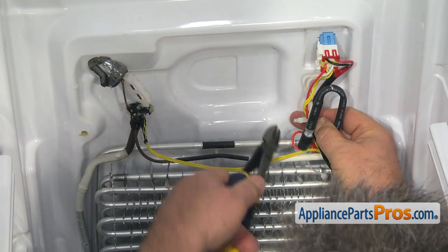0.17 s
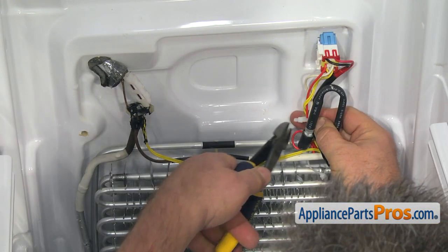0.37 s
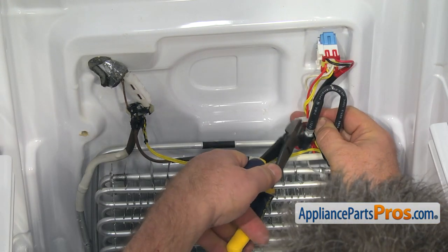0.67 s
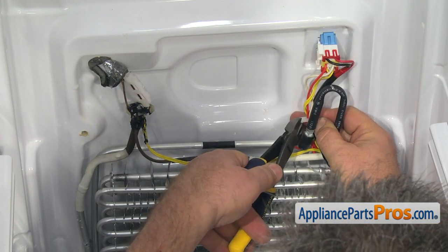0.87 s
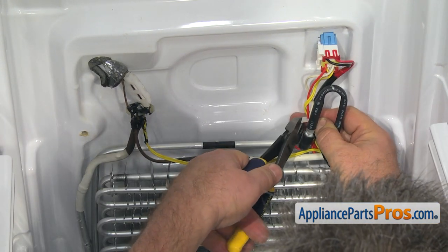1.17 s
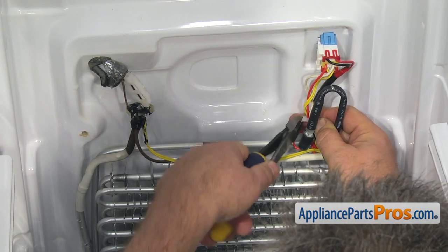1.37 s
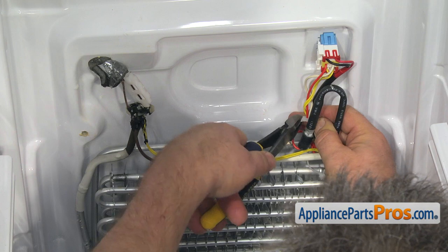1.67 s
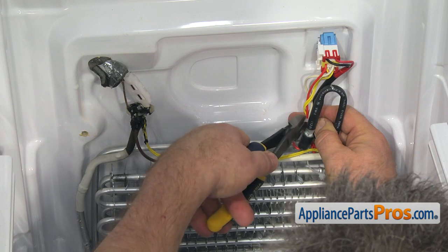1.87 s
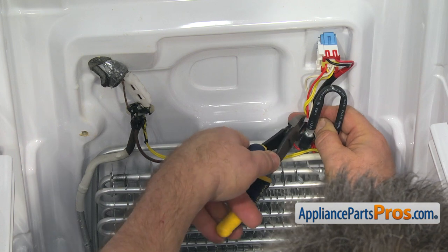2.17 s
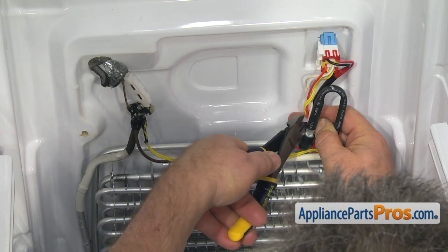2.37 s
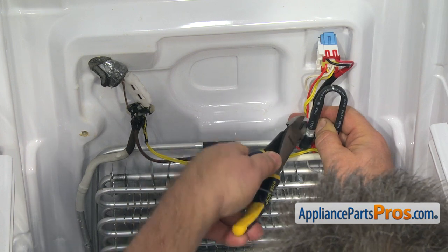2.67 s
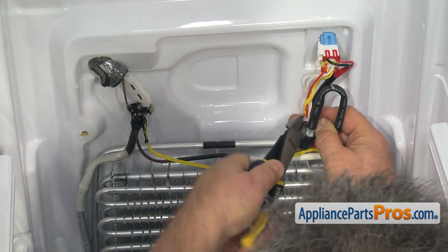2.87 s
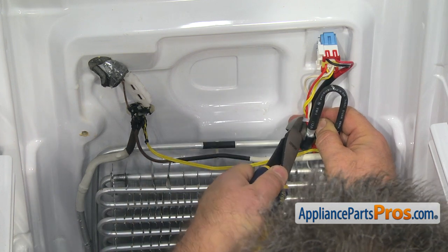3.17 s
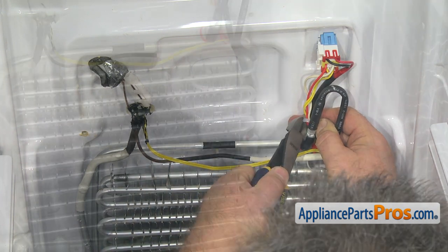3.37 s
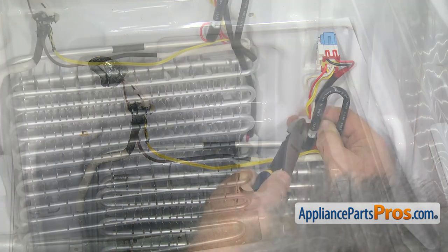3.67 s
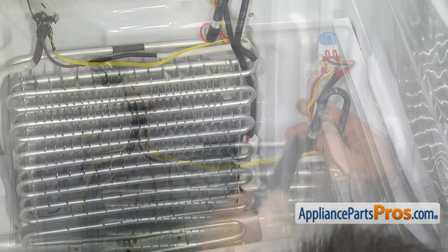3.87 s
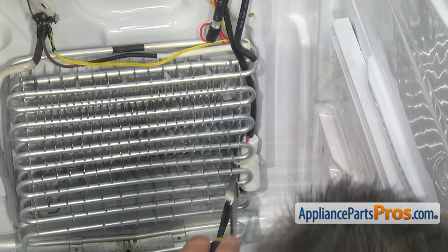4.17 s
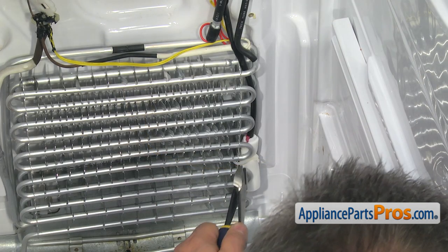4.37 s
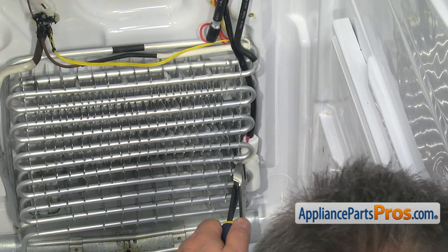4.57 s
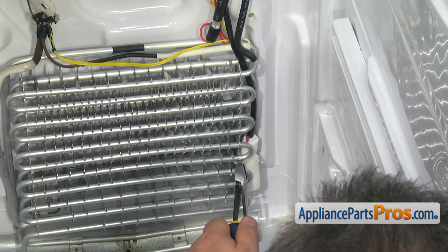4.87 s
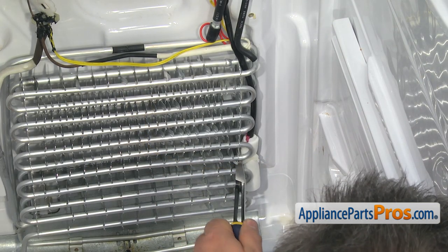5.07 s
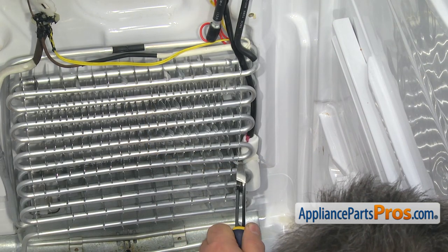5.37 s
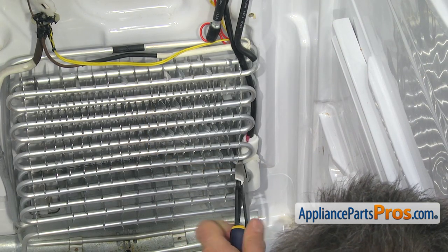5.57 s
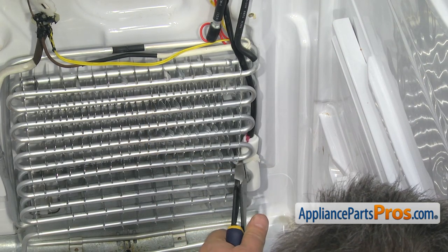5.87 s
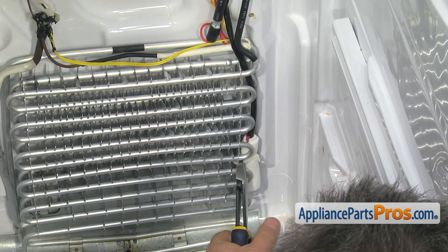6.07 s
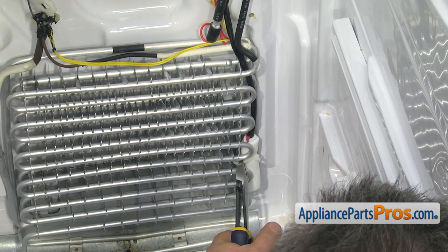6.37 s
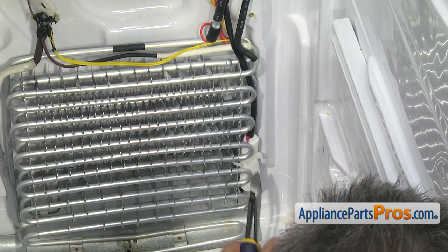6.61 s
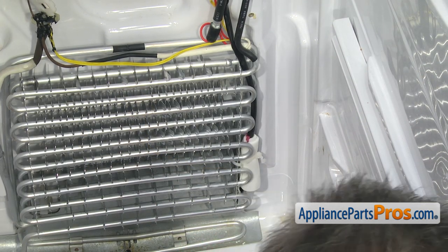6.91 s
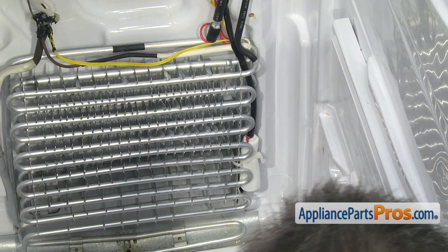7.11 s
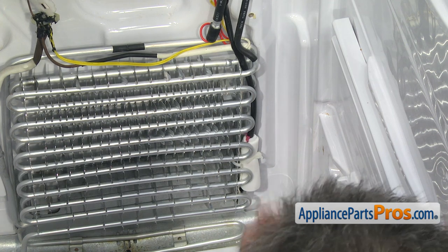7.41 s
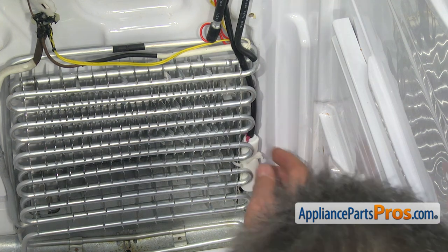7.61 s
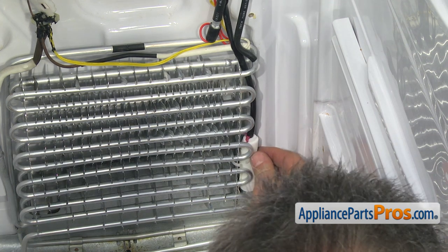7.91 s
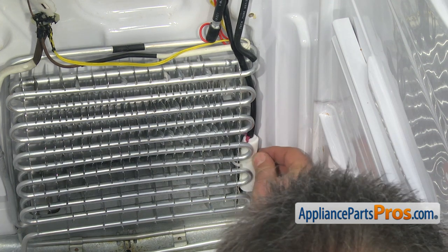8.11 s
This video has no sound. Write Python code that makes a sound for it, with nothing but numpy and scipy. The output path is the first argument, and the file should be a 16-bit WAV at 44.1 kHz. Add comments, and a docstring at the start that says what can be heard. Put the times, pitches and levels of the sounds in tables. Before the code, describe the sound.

Close, boxy and quiet: a deep, unsteady hum, faint hiss and hand movement, with tiny dry ticks for the first seconds. A crisp plastic snip bursts out, its bright wash dying fast. Moderate knocks and a short rub lead to a loud clank that rings the panels and thumps the walls. Then a second fuller snip, a sliding contact just after, and soft fumbling at the end, all inside a hard cabinet.

```python
"""Inside a hard-walled freezer cabinet, side cutters snip two plastic ties off a wire harness.
Cuts, knocks and rubs are short pushes: they fill the box with a bright wash of noise and set its
panels ringing. Heavy blows swing the walls, small parts tick (short bursts of noise), and at times
one panel resonance, fed by noise, sings faintly. A low hum of ringing noise wavers below; moving
hands and arms make the panels murmur and the hiss swell."""
import sys
import numpy as np
from scipy import signal
from scipy.fft import rfft, irfft
from scipy.io import wavfile
from scipy.ndimage import uniform_filter1d

SR = 44100
rng = np.random.default_rng(int(sys.argv[2]) if len(sys.argv) > 2 else 0)


def log_audio(samples):
    """Write samples as a 16-bit WAV file to the path given in sys.argv[1]."""
    # one column per channel
    frames = np.atleast_2d(samples).T
    # limit to full scale, then quantise
    limited = np.clip(frames, -1, 1)
    pcm = np.round(limited * 32767).astype(np.int16)
    wavfile.write(sys.argv[1], SR, pcm)


def volts_from_db(level):
    """Convert decibel levels to linear amplitude ratios."""
    exponent = np.asarray(level, float) / 20
    return 10 ** exponent


N = 363825   # length in samples

# Levels of contacts, panels, walls and wash are relative drives, not loudness in the mix.
# the blades meet: t/s, panels/dB, 0.7-3 kHz/dB, 7-16 kHz/dB, contact length/s
CUTS = [(3.512, -39.5, -35, -24.5, 0.0051), (6.4651, -33, -33, -19, 0.0086)]
# tool, fingers and loose tie ends touch wires, fins and walls:
# t/s, panels/dB, 0.7-3 kHz/dB, 7-16 kHz/dB
TOUCHES_AND_KNOCKS = [(0.0386, -83, -71.5, -58), (0.28, -66.5, -73.5, -90), (1.813, -60.5, -77, -81),
                      (1.8574, -56.5, -55.5, -58.5), (2.3305, -59, -64.5, -71.5), (2.37, -66, -67, -80),
                      (2.484, -63.5, -69, -73), (2.558, -69, -78, -76), (2.625, -72, -74, -74),
                      (3.8824, -49.5, -70.5, -63.5), (4.179, -77, -74, -71), (4.6374, -42.5, -54, -61.5),
                      (5.174, -31.5, -38, -31.5), (5.8324, -63, -75, -74), (7.717, -62.5, -65, -79.5),
                      (7.8491, -62, -52, -62), (8.2091, -71, -57, -50)]
# longer, sliding contacts of skin, steel or a loose tie end:
# t/s, panels/dB, 0.7-3 kHz/dB, 7-16 kHz/dB, contact length/s
SLIDING_CONTACTS = [(2.645, -63, -72.5, -62, 0.024), (3.521, -59.5, -68.5, -32.5, 0.0083),
                    (3.748, -56, -67, -72.5, 0.015), (5.135, -42, -42, -49.5, 0.09),
                    (5.47, -59.5, -76, -73, 0.035), (5.565, -54.5, -66, -68.5, 0.025),
                    (5.62, -54, -83, -87, 0.045), (5.68, -67, -78, -74.5, 0.038),
                    (6.608, -41.5, -39.5, -37, 0.012), (7.142, -56, -63.5, -64, 0.013),
                    (7.935, -96, -69, -62, 0.024), (8.125, -79, -67, -58, 0.033)]
# dry ticks of small hard parts: t/s, peak level/dB, f/Hz, second f/Hz, mounting level/dB
SMALL_PART_TICKS = [(0.818, -69, 1076, 2690, 1), (1.393, -65, 1970, 4400, -6),
                    (1.585, -62.5, 7360, 5100, -12), (2.102, -60.5, 1500, 2180, -8),
                    (2.851, -63.5, 6130, 9000, -8), (3.051, -62.5, 1800, 5500, -13),
                    (3.631, -34, 2257, 4440, 5), (7.681, -62, 3400, 9000, -7.5),
                    (8.083, -56.5, 6400, 3820, -12)]
# one panel resonance sings faintly for a while: start t/s, length/s, f/Hz, rms before fading/dB
PANEL_SINGING = [(2.364, 0.46, 1097, -82.5), (4.125, 0.27, 356, -72), (4.267, 0.24, 766, -85.5),
                 (6.231, 0.25, 754, -80.5), (6.741, 0.19, 395, -76)]
# heavy blows on the large walls: t/s, level/dB
HEAVY_BLOWS = [(3.52, -35), (3.885, -49), (5.181, -25), (5.623, -48.5), (6.471, -30.5), (8.202, -49.5)]
# a blow catches one panel or tube hard, and it rings on: t/s, f/Hz, level/dB, 60 dB fade/s
HARD_RINGS = [(4.647, 387, -49, 0.24), (4.642, 500, -54.5, 0.21), (4.642, 636, -55, 0.15),
              (5.176, 1002, -62, 0.74), (5.177, 1206, -69, 0.57), (5.178, 2200, -67, 0.36),
              (5.178, 446.6, -46, 0.35), (6.472, 452, -57, 0.17), (6.612, 1570, -74, 0.7),
              (6.614, 975, -64, 0.42)]
# lowest modes of the large walls: f/Hz, level/dB, 60 dB fade/s
WALL_MODES = [(97.7, 0, 0.19), (131.9, -1.5, .12), (188.6, 5, 0.1), (260, -4, 0.15)]
# resonances of the cabinet panels: f/Hz, level/dB, 60 dB fade/s
PANEL_MODES = [(365.3, -2, 0.27), (439, -6, 0.044), (589.7, -12.5, 0.086), (688, -18.5, 0.16),
               (802, -17, 0.55), (895, -11.5, 0.33), (1048, -11.5, 0.23), (1270, -18.5, 0.1),
               (1570, -19.5, 0.48), (2200, -24, 0.17)]
# how fast the wash dies at each pitch: f/Hz, 60 dB fade/s
WASH_FADE = [(150, 0.18), (1000, 0.073), (3000, 0.1), (8000, 0.087), (12000, 0.067), (16000, 0.077)]
# colour of the wash: f/Hz, after a cut/dB, after other contacts/dB, late tail/dB
WASH_COLOUR = [(142, -4.5, -0.5, -15), (300, -5.5, -8.5, -23), (500, -1.5, -5, -11), (788, -0.5, -2.5, -15),
               (1130, 2.5, -3.5, -14), (1500, -1, 0, -21.5), (2200, -0.5, -2, -22.5),
               (2900, -8.5, -9, -22.5), (4110, -2, -9, -32), (5500, -5, -4, -28.5), (6530, -6, 0.5, -36.5),
               (9000, 0.5, 5.5, -36), (12400, 10.5, -0.5, -30), (16700, -6, 7.5, -42.5)]
# colour of the steady background: f/Hz, relative level per Hz/dB
QUIET_COLOUR = [(12, -41.5), (20, -24), (86, -10.5), (101, -6.5), (113, -33.5), (150, 4), (177, -32),
                (241, -22.5), (319, -30), (357, -31.5), (780, -36), (897, -36.5), (1220, -35.5),
                (14300, -38.5), (16000, -85)]
# colour of the noise that differs between the channels: f/Hz, relative level per Hz/dB
SIDE_COLOUR = [(12, -33.5), (20, 4.5), (30, -8), (38, -23), (53, -36), (1650, -34), (13700, -33),
               (15800, -37.5)]
# the hum wavers: t/s, rms level/dB
HUM_LEVEL = [(0.0, -60.5), (0.5, -60), (1.2, -63), (1.9, -59.5), (2.6, -59), (3.302, -62.5), (3.7, -63),
             (4.05, -58.5), (4.25, -65.5), (4.66, -56), (5.26, -62), (5.55, -62), (5.8, -57.5),
             (6.1, -60.5), (7.1, -59.5), (7.309, -56), (7.5, -60), (8.25, -63.5)]
# hands and arms move in the box: middle t/s, length/s, murmur level/dB, hiss level/dB
HAND_MOVES = [(0.052, 1, -77, -76), (1.47, 0.51, -77.5, -97), (1.886, 0.31, -69.5, -100),
              (2.533, 0.88, -77, -95), (3.809, 0.67, -69, -77.5), (4.107, 0.91, -72, -77),
              (5.101, 0.18, -78.5, -77), (5.57, 0.35, -70, -79.5), (6.596, .4, -69.5, -105),
              (6.97, 0.28, -76, -77), (7.284, 0.6, -70.5, -69), (7.837, 0.75, -71.5, -80.5),
              (8.27, 0.45, -68, -71.5)]


def rms_one(x):
    """Scale to an rms (average strength) of 1."""
    return x / np.sqrt(np.mean(x ** 2) + 1e-20)


def at_hz(table, hz, column=1):
    """Read a table column between its rows, with pitch on a log scale."""
    table = np.array(table)
    return np.interp(np.log(hz), np.log(table[:, 0]), table[:, column])


def band(x, low_hz, high_hz):
    """Keep only the sound between two frequencies."""
    sos = signal.butter(2, [low_hz, min(high_hz, .45 * SR)], "band", fs=SR, output="sos")
    return signal.sosfilt(sos, x)


def ring(x, hz, t60_s):
    """A resonance: a click of height 1 starts a sine of height 1 that falls 60 dB in t60_s."""
    shrink = volts_from_db(-60 / (t60_s * SR))
    turn = 2 * np.pi * hz / SR
    # the tiny offset keeps the filter away from vanishingly small numbers
    return signal.lfilter([0, np.sin(turn)], [1, -2 * shrink * np.cos(turn), shrink ** 2], x + 1e-18)


def contact_rows():
    """All contacts as rows: t/s, 3-7 kHz/dB, panels/dB, 0.7-3 kHz/dB, 7-16 kHz/dB, length/s."""
    touch_s = 0.0049
    dull_stretch = 0.35   # a dull touch is soft and lasts longer: dB of length per dB panels over treble
    touches = []
    for s, low_db, mid_db, top_db in TOUCHES_AND_KNOCKS:
        length_s = touch_s * volts_from_db(dull_stretch * (low_db - top_db))
        touches.append((s, low_db, mid_db, top_db, length_s))
    every = list(CUTS) + touches + list(SLIDING_CONTACTS)
    s, low_db, mid_db, top_db, length_s = np.transpose(every)
    # 3-7 kHz lies between its neighbours, a little higher for contacts that are not cuts
    presence_db = top_db + 0.2 * (mid_db - top_db)
    presence_db = presence_db + 2.5 * (np.arange(len(s)) >= len(CUTS))
    return np.transpose([s, presence_db, low_db, mid_db, top_db, length_s])


def contacts(rows, levels_db):
    """Each contact is a half-sine push of its own length and unit area, times its level."""
    out = np.zeros(N)
    for row, level_db in zip(rows, levels_db):
        at = round(row[0] * SR)
        size = max(round(row[5] * SR), 8)
        push = np.sin(np.pi * np.arange(size) / size)[:N - at]
        out[at:at + size] += volts_from_db(level_db) * push * np.pi / (2 * size)
    return out


def wash(rows, uneven_db=2.0, grain_db=2.0):
    """Dense echoes build up in a few ms and die band by band, with a weak late tail."""
    rise_s, level_db, late_stretch = 0.001094, -7, 3.5
    out = np.zeros(N)
    edges = 150 * 2 ** np.arange(0, 7, 1 / 3)   # bands a third of an octave wide
    white = rng.standard_normal((2, N))
    chance = rng.standard_normal((len(rows), len(edges)))   # every contact colours the wash anew
    rise = np.exp(-1 / (rise_s * SR))
    grain = rms_one(uniform_filter1d(rng.standard_normal(N), size=40))
    is_cut = np.arange(len(rows)) < len(CUTS)
    for k, (low, high) in enumerate(zip(edges, edges[1:])):
        hz = np.sqrt(low * high)
        range_hz = np.log([400, 1500, 4600, 10500])
        contact_db = [np.interp(np.log(hz), range_hz, row[[2, 3, 1, 4]]) for row in rows]
        colour_db = np.where(is_cut, at_hz(WASH_COLOUR, hz, 1), at_hz(WASH_COLOUR, hz, 2))
        press = contacts(rows, contact_db + colour_db + uneven_db * chance[:, k] + level_db)
        press = signal.lfilter([1 - rise], [1, -rise], press + 1e-18)
        fall = volts_from_db(-60 / (at_hz(WASH_FADE, hz) * SR))
        late_fall = fall ** (1 / late_stretch)   # the room beyond the open door dies more slowly
        shape = signal.lfilter([1], [1, -fall], press)
        late = signal.lfilter([1], [1, -late_fall], press)
        shape += volts_from_db(at_hz(WASH_COLOUR, hz, 3)) * late
        echoes = volts_from_db(grain_db * grain * (hz > 1200))   # single echoes stand out above 1200 Hz
        noise = band(band(white[k % 2], low, high), low, high)
        out += shape * echoes * rms_one(noise)
    return out


def panels(rows, uneven_db=1.5, rattle_s=0.0064, split=.025):
    """A contact rattles for a moment; each panel answers with five close modes that beat."""
    panel_db = -10.5
    out = np.zeros(N)
    chance = rng.standard_normal((len(rows), len(PANEL_MODES)))
    fade = np.exp(-1 / (rattle_s * SR))
    for k, (hz, level_db, t60_s) in enumerate(PANEL_MODES):
        # the higher the panel mode, the more its blow follows the 0.7-3 kHz column
        share = np.interp(np.log(hz), np.log([400, 1200]), [0, 1])
        blow_db = (1 - share) * rows[:, 2] + share * rows[:, 3] + uneven_db * chance[:, k]
        push = contacts(rows, blow_db + level_db + panel_db)
        press = signal.lfilter([1], [1, -fade], push + 1e-18)
        for detune in 1 + split * np.array([-3.0, -0.36, -1.1, 0.7, 1.1]):
            rattle = press * rng.standard_normal(N) * np.sqrt(1 - fade ** 2)
            out += ring(rattle, hz * detune, t60_s)
    return out


def thump(rows):
    """The jolt of each cut shakes the whole cabinet in one heavily damped swing."""
    hz, drive_db, t60_s = 45, -22, 0.086
    push = contacts(rows[:len(CUTS)], [drive_db] * len(CUTS))
    return ring(push, hz, t60_s)


def jolts():
    """A heavy blow pushes the large walls softly; they swing at their lowest modes."""
    out = np.zeros(N)
    at = [round(s * SR) for s, db in HEAVY_BLOWS]
    for hz, level_db, t60_s in WALL_MODES:
        push = np.zeros(N)
        push[at] = volts_from_db(np.array(HEAVY_BLOWS)[:, 1] + level_db)
        soft_push = signal.lfilter([.01], [1, -.99], push)
        out += ring(soft_push, hz, t60_s)
    return band(band(out, 70, 600), 65, 900)


def rings(split=.03):
    """Each ring is four close modes of uneven strength that beat as they die."""
    out = np.zeros(N)
    chance = rng.standard_normal((len(HARD_RINGS), 4))
    for (s, hz, level_db, t60_s), uneven in zip(HARD_RINGS, chance):
        click = np.zeros(N)
        click[round(s * SR)] = volts_from_db(level_db)
        for detune, step in zip([-1.9, -1.1, 0.23, 1.9], uneven):
            out += volts_from_db(2 * step) * ring(click, hz * (1 + split * detune), t60_s)
    return out


def ticks(width=0.19, edge_db=-12.0):
    """A dry burst of noise passes two resonances of a small part, with a thin bright edge."""
    t60_s, second_db = .055, -5
    out = np.zeros(N)
    t = np.arange(SR // 8) / SR
    for s, peak_db, hz, second_hz, mounting_db in SMALL_PART_TICKS:
        burst = rng.standard_normal((4, len(t))) * volts_from_db(-60 * t / t60_s)
        part = band(burst[0], hz / (1 + width), hz * (1 + width))
        second = band(burst[1], second_hz / (1 + width / 2), second_hz * (1 + width / 2))
        mounting = band(burst[3], hz / 3.6, hz / 1.7)   # what the part is mounted on
        tick = rms_one(part) + volts_from_db(second_db) * rms_one(second)
        tick += volts_from_db(edge_db) * rms_one(burst[2])
        tick += volts_from_db(mounting_db) * rms_one(mounting)
        at = round(s * SR)
        out[at:at + len(t)] += volts_from_db(peak_db) * tick / np.abs(tick).max()
    return out


def panel_singing():
    """Noise feeds one narrow panel resonance, which swells and fades."""
    out = np.zeros(N)
    for s, length_s, hz, level_db in PANEL_SINGING:
        at, size = round(s * SR), round(length_s * SR)
        tone = ring(rng.standard_normal(SR), hz, .25)[-size:]   # skip the build-up
        out[at:at + size] += volts_from_db(level_db) * rms_one(tone) * np.sqrt(np.hanning(size))
    return out


def movement(rest_db, column, lumpy_db):
    """Level at rest plus a swell in irregular lumps for each hand move, added as power."""
    times, power = np.arange(N) / SR, 0
    for row in HAND_MOVES:
        phase = np.clip((times - row[0]) / row[1], -.5, .5)
        power = power + (volts_from_db(row[column]) * np.cos(np.pi * phase)) ** 2
    lumps = uniform_filter1d(uniform_filter1d(rng.standard_normal(N), size=700), size=500)
    lump_gain = rms_one(volts_from_db(lumpy_db * rms_one(lumps)))
    return np.sqrt(volts_from_db(rest_db) ** 2 + power * lump_gain ** 2)


def background(mode_db=-3.0):
    """Noise in three ranges: hum round one resonance, murmur in the panels, and hiss."""
    hum_hz, hum_width_hz, hum_line_db = 81.85, 15, 16
    murmur_rest_db, hiss_rest_db = -77.5, -79.5
    hz = np.maximum(np.arange(N // 2 + 1) * SR / N, 5)
    colour = volts_from_db(at_hz(QUIET_COLOUR, np.minimum(hz, 14000)))   # stays level above 14 kHz
    low = 1 / (1 + (hz / 170) ** 4)
    high = 1 / (1 + (1800 / hz) ** 4)
    hum, murmur, hiss = [irfft(rfft(rng.standard_normal(N)) * colour * share, N)
                         for share in (low, 1 - low - high, high)]
    line = ring(rng.standard_normal(N), hum_hz, np.log(1000) / (np.pi * hum_width_hz))
    hum = rms_one(hum) + volts_from_db(hum_line_db) * rms_one(line)
    rung = sum(volts_from_db(level_db) * ring(murmur, f, t60_s) for f, level_db, t60_s in PANEL_MODES)
    plain = murmur / np.std(murmur) / 2
    murmur = rms_one(band(murmur, 200, 5700)) + volts_from_db(mode_db) * rms_one(rung) + plain
    hum_gain = volts_from_db(np.interp(np.arange(N) / SR, *np.transpose(HUM_LEVEL)))
    murmur_gain = movement(murmur_rest_db, column=2, lumpy_db=2.5)
    hiss_gain = movement(hiss_rest_db, column=3, lumpy_db=.8)
    return hum_gain * rms_one(hum) + murmur_gain * rms_one(murmur) + hiss_gain * rms_one(hiss)


def side_noise():
    """Faint coloured noise, added to one channel and taken from the other."""
    hz = np.maximum(np.arange(N // 2 + 1) * SR / N, 5)
    side = irfft(rfft(rng.standard_normal(N)) * volts_from_db(at_hz(SIDE_COLOUR, hz)), N)
    return volts_from_db(-78) * rms_one(side) * np.array([[1], [-1]])


def scene():
    """All contacts share one box and its panels; the two channels differ only by faint noise."""
    rows = contact_rows()
    mid = wash(rows) + panels(rows) + thump(rows) + jolts() + rings()
    mid = mid + ticks() + panel_singing() + background()
    return mid + side_noise()


def band_limit(x):
    """A steep low-pass at the top of the band."""
    return signal.sosfilt(signal.butter(12, 16640, fs=SR, output="sos"), x)


def record(dry):
    """Turn the finished mix into the final sound."""
    return band_limit(dry)


dry = scene()
out = record(dry)
log_audio(out)
```